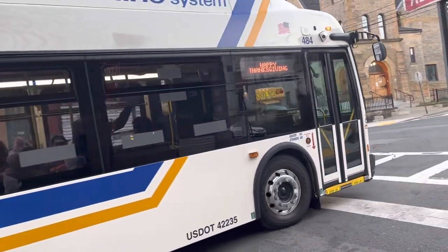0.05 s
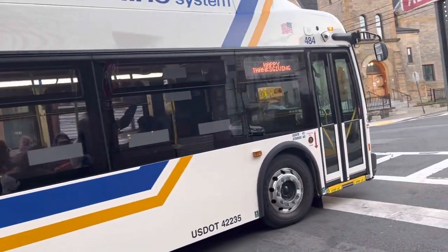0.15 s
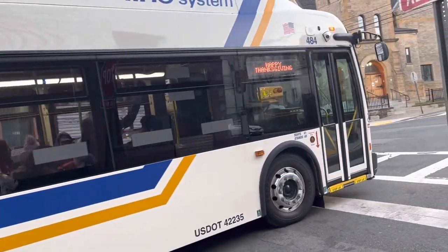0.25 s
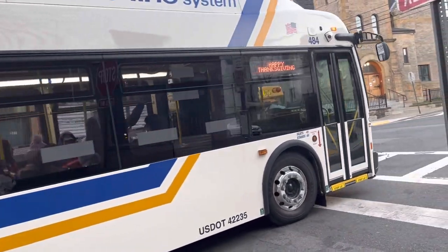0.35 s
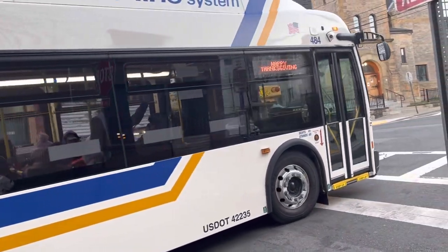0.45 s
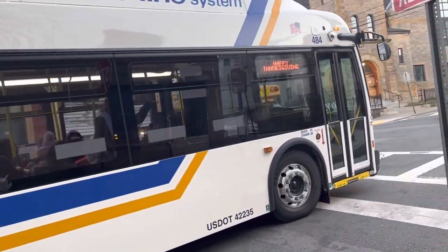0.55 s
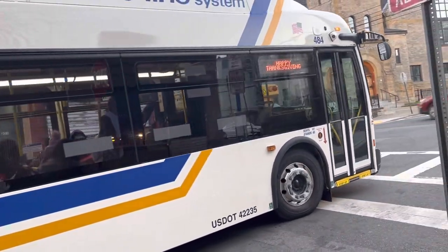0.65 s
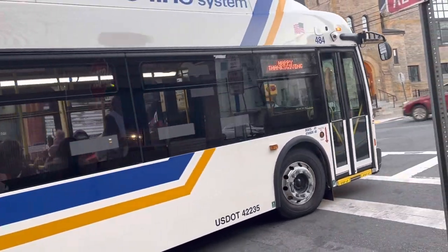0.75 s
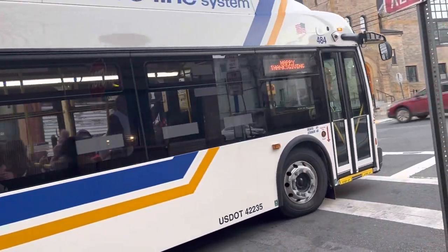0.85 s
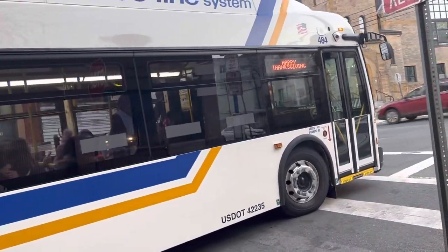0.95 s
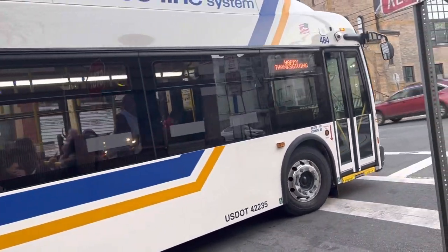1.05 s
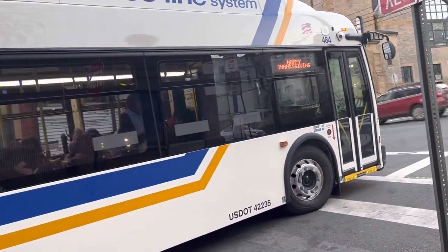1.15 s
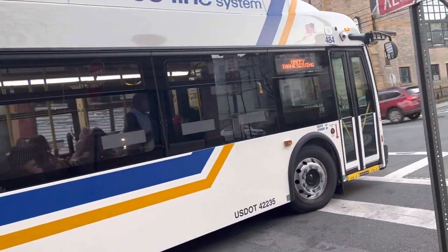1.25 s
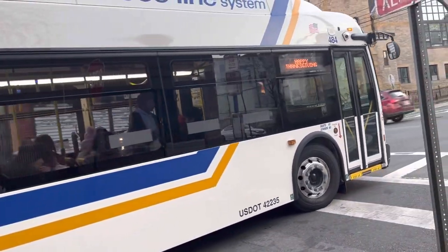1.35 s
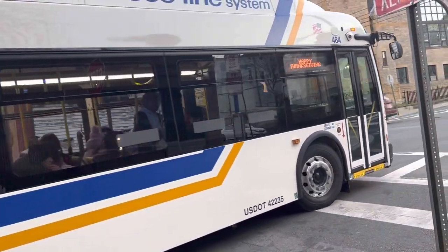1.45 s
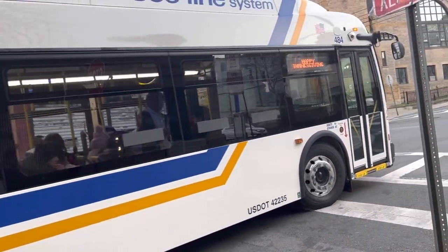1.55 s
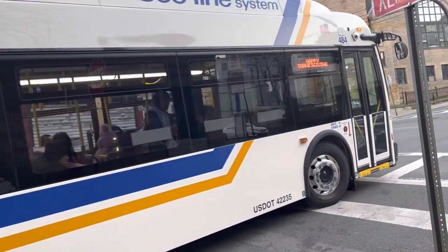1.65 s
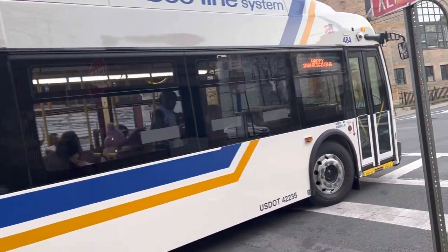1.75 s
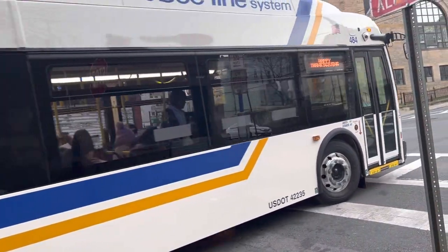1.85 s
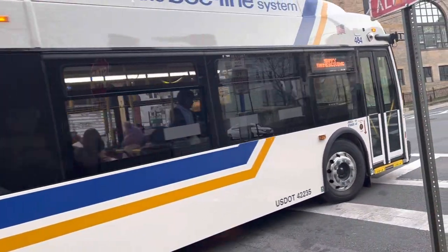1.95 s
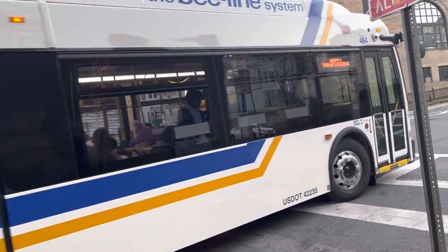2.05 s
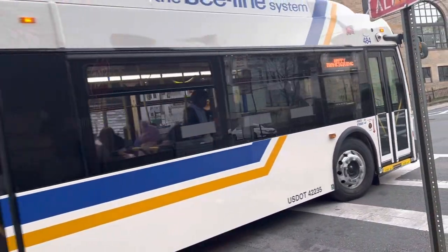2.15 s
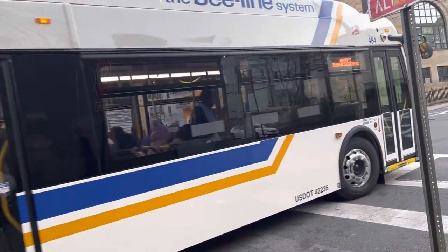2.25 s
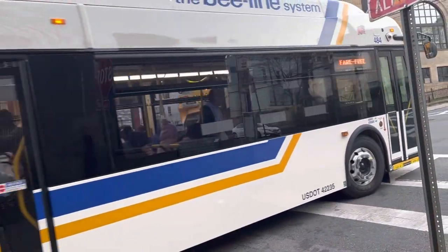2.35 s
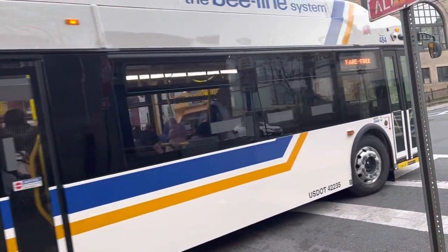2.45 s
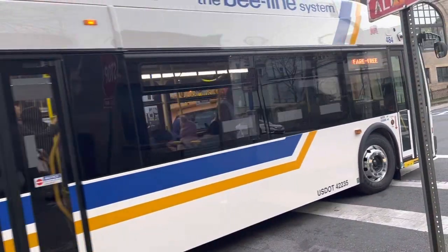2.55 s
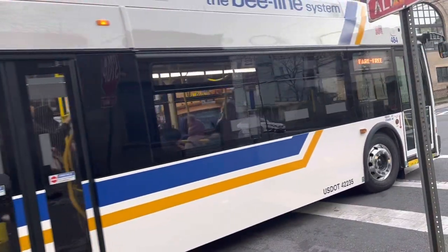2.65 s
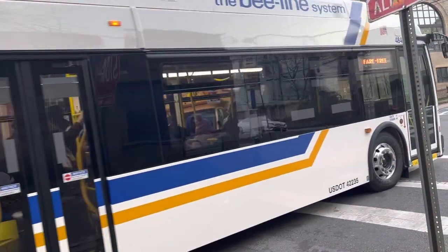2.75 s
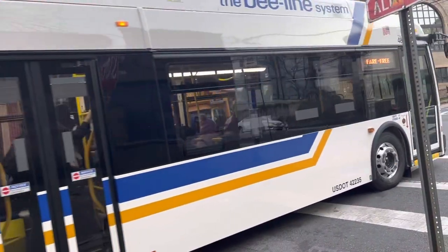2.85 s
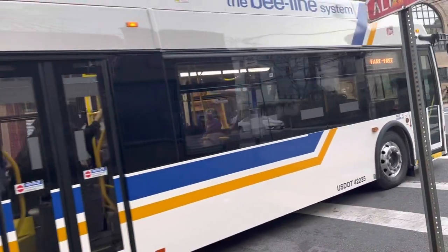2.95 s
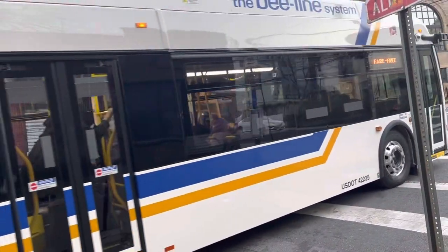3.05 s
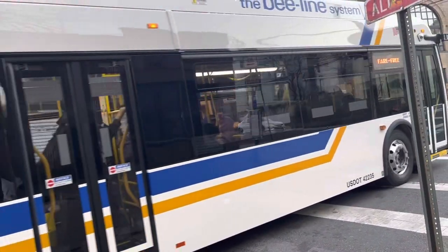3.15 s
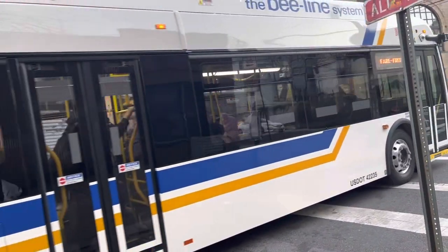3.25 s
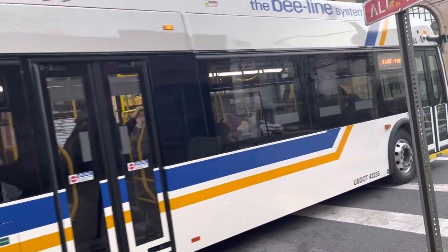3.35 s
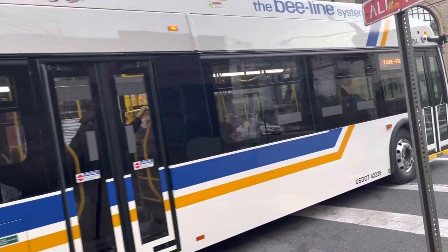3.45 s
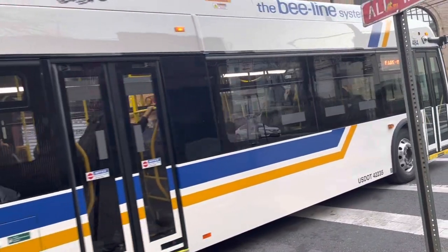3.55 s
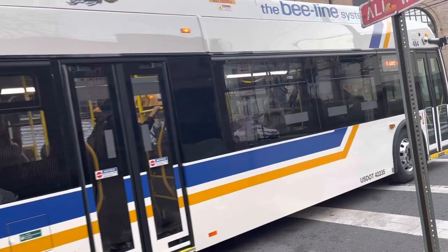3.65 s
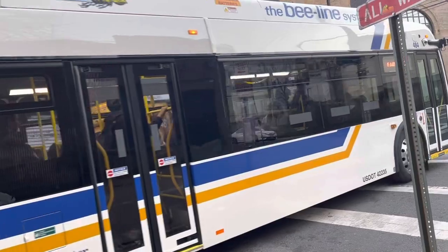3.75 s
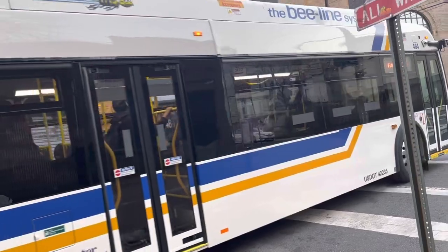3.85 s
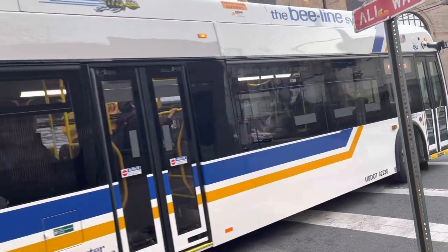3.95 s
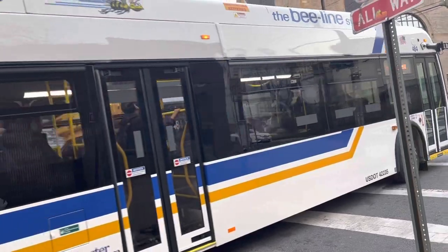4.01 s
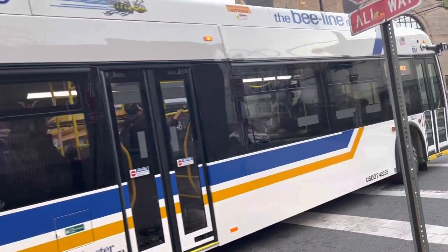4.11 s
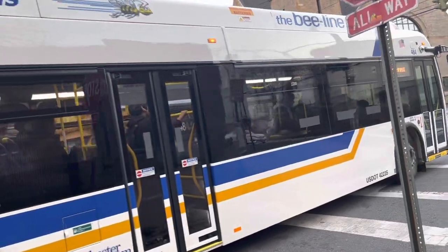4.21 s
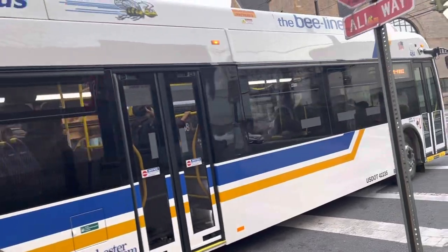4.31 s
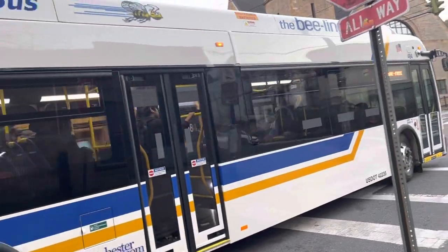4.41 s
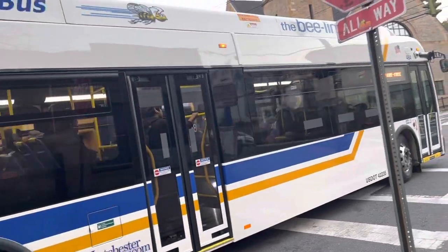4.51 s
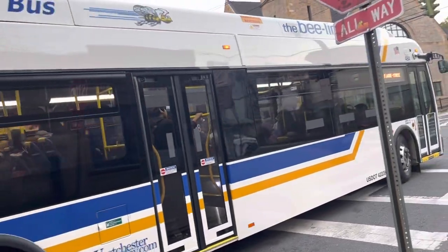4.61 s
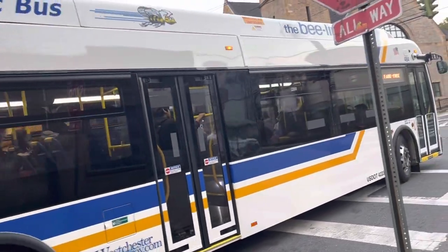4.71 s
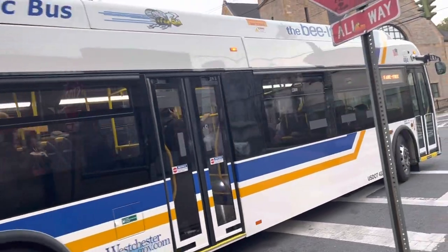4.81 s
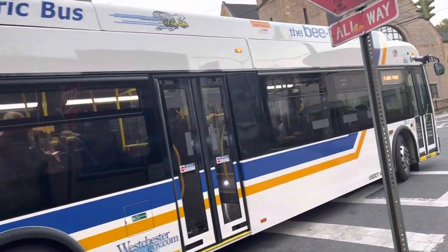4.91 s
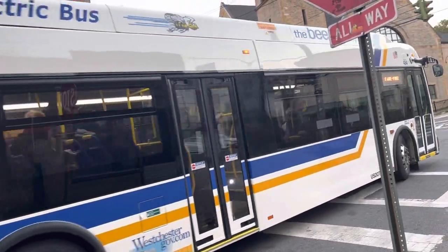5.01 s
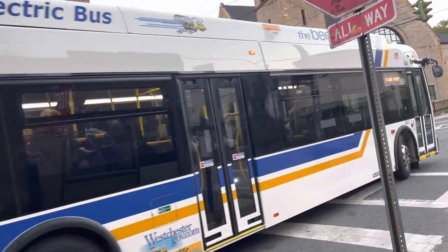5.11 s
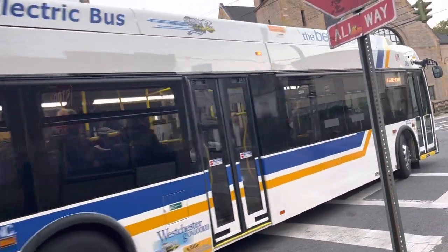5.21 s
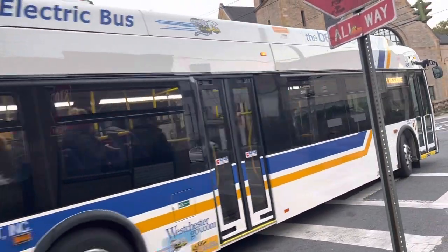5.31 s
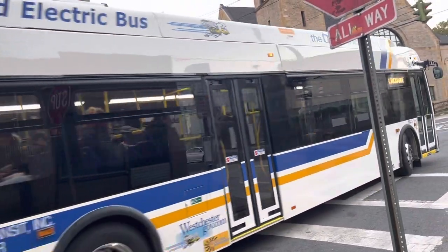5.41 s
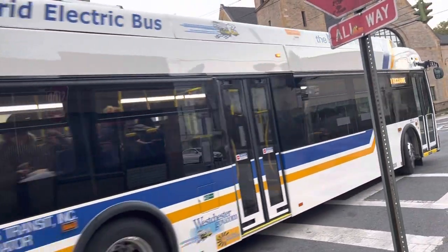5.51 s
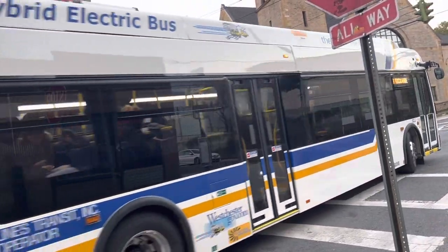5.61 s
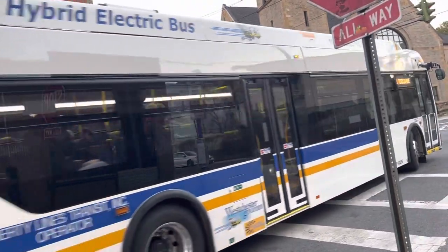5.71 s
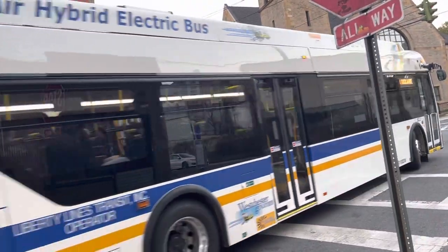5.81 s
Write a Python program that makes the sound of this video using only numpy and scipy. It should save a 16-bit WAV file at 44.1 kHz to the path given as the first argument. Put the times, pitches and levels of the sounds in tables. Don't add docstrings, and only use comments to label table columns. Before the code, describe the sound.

A hybrid bus idles about ten metres away on a street, low throbbing exhaust with faint clatter and a steady hum. The engine blips near two seconds and settles; a soft air hiss follows, then a faint and a sharper very high brake squeak. From about four and a half seconds the revs climb with electric whine and buzz as the bus nears, loudest at the end. Handheld phone in stereo on the pavement, short echoes from house fronts.

```python
import sys
import numpy as np
from scipy import signal
from scipy.fft import rfft, irfft, next_fast_len
from scipy.io import wavfile
from scipy.ndimage import uniform_filter1d

SR = 44100
rng = np.random.default_rng(int(sys.argv[2]) if len(sys.argv) > 2 else 0)


def transcribe(u):
    v = np.clip(np.atleast_2d(u).T, -1, 1)
    q = np.round(v * 32767).astype(np.int16)
    wavfile.write(sys.argv[1], SR, q)


def ratio(d):
    e = np.asarray(d, float) / 20
    return 10 ** e


N = 258867
T = np.arange(N) / SR

# (time [s], firing rate [Hz], firing tone level [dB], exhaust drone level [dB])
ENGINE = [(0, 42.6, -35, -30.5), (1.2, 42.6, -31, -32.5), (1.62, 42.9, -31, -32), (1.8, 44.65, -35, -26.5),
          (1.94, 48.8, -34, -24.5), (2.08, 52.5, -30, -24), (2.25, 52.8, -28.5, -23.5),
          (2.48, 48.23, -24, -26.5), (2.72, 43.8, -36, -25.5), (3.3, 42.62, -30.5, -25.5),
          (4.55, 42.59, -29, -23), (4.82, 46.13, -25.5, -23), (4.95, 49.66, -23, -20.5),
          (5.1, 55.59, -30, -19.5), (5.25, 60.52, -35, -18.5), (5.38, 63.9, -23, -18.5),
          (5.55, 66.24, -22.5, -17.5), (5.87, 66.9, -34, -16)]
CYLINDER_DB = [-0.31, -0.64, 0.72, -2.3, 0.23, -.8]
# (frequency [Hz], width [Hz], level [dB])
EXHAUST_MODES = [(85.6, 17, -7.5), (119.3, 20, -8), (168.1, 16, -5.5), (281, 21, -7.5), (349, 34.3, -5),
                 (401.2, 22.8, -9), (628, 140, -7.5)]
# (frequency [Hz], width [Hz])
TAILPIPE = (232.4, 38.7)
# (time [s], distance [m])
DISTANCE = [
    (0, 11.1),
    (1.9, 11),
    (4.5, 10.2),
    (5.0, 7.4),
    (5.4, 5.35),
    (5.87, 4.75),
]
IDLE_DRONE_DB, IDLE_LOAD, LOAD_PER_HZ = -31.5, 0.53, .03
BOOM_DB, BOOM_DB_PER_S, BOOM_TURNED_S, BOOM_REV_DB = -6, 5, 2.7, -0.08

# (level at 10 m [dB], share of distance gain [ratio], share of exhaust effort [ratio])
BAY = [
    (-35, 0.79, 0.12),
    (-42.5, 0.39, 0.049),
    (-47, 0.76, 0.43),
    (-65, 1.9, .05),
]
# (frequency [Hz], level [dB per Hz])
RUMBLE = [(35, -19), (60, -0.5), (100, -10.5), (140, -3.5), (190, -2), (250, 0), (330, -6.5), (420, -7.5),
          (520, -9), (640, -7.5), (760, -14.5), (900, -18.5)]
# (frequency [Hz], level [dB per Hz])
KNOCK = [(750, -26), (1000, -0.5), (1250, 2), (1550, 2.5), (1700, -11)]
# (frequency [Hz], level [dB per Hz])
CLATTER = [(1600, -1.5), (1900, -1.5), (2500, -0.5), (3100, -6), (4000, -5), (4600, -7), (5300, -5),
           (6300, -11), (7200, -8), (8100, -19), (9000, -9.5), (11000, -22.5), (14000, -20), (15600, -30)]
# (frequency [Hz], level [dB per Hz])
AIR = [(8800, -24), (9800, -3), (11000, 0), (13000, -1), (13900, -8), (14600, -22)]
# (frequency [Hz], width [Hz], level [dB])
PANELS = [(660, 60, -47), (1450, 110, -45), (5330, 420, -57), (8010, 220, -68)]

# (frequency [Hz], rms level [dB])
COMPRESSOR = [(78, -45), (116, -32), (233, -35), (312, -42.5)]
# (level at rest [dB], level gained under full torque [dB])
SIDEBANDS = [
    (-76, 12),
    (-76, 9),
]
# (start time [s], rise [s])
TORQUE_S = (4.55, .5)
# (start time [s], length [s], level [dB])
LOW_BURSTS = [
    (5.11, .1, -39),
    (5.2, .145, -34),
    (5.335, .2, -38),
]
# (start time [s], length [s])
LOW_RATE_S = (5.11, 0.46)
# (start time [s],
# length [s], frequency [Hz], level [dB])
RINGS = [(0.8, .75, 3600, -70), (5.31, .2, 4243, -41), (2.04, .14, 1490, -46), (3.2, .25, 1190, -48),
         (0.6, .25, 1190, -50), (2.6, .3, 4050, -62), (5.5, .35, 1590, -46), (3.35, 1.0, 661, -41),
         (5.17, .14, 2150, -49)]
# (start time [s], length [s], level [dB])
VENT = (2.77, .54, -57.5)
# (frequency [Hz], width [Hz], level [dB])
VALVE_MODES = [(9150, 600, 1), (10500, 2000, 2)]
# (start time [s], length [s], frequency [Hz], level [dB])
SQUEAKS = [
    (3.54, 0.33, 14330, -54),
    (4.347, 0.34, 14180, -39.5),
]
# (start time [s], length [s], level [dB]); pitch at the start and its climb
MOTOR_ON, MOTOR_HZ, MOTOR_HZ_PER_S = (4.5, .55, -47), 1510, 620
# (start time [s], length [s], level at 10 m [dB], share of distance gain [ratio])
GEAR_ON = (5.1, 1.2, -54, 2.0)
GEAR_TEETH = 28

# (frequency [Hz], lead of the left [rad])
PORT_PHASE = [(0, 0), (150, .4), (400, .9), (750, 1.5), (1200, 3.1), (1550, 4.2), (1810, 6.3), (3450, 8.2),
              (4310, 7.2), (5430, 11.0), (7410, 9.8), (9400, 9.2), (10900, 6.3), (13000, 6.3), (13900, 4.0),
              (14350, 4.55), (14750, 3.2)]
# (frequency [Hz], left minus right level [dB])
PORT_BALANCE = [(40, -0.5), (110, 0), (370, .5), (680, 0.5), (1250, -5.5), (2290, 5), (4210, 6.5),
                (7730, 3.5), (14200, -1)]
# (frequency [Hz], level over the direct sound [dB])
STREET = [(40, -24), (150, -12), (400, -6), (1000, -3.5), (2500, 0), (5000, 1), (7500, -11), (14000, -14)]
STREET_T60_S, FIRST_ECHO_S = .18, .012
STREET_DRIFT = 8
TONE_ECHO_DB, TONE_DB = -9, 3


def level(x, db):
    return x * ratio(db) / np.sqrt(np.mean(x ** 2))


def curves(table):
    times, *columns = np.transpose(table)
    return [np.interp(T, times, column) for column in columns]


def on_log_hz(table, hz):
    table_hz, values = np.transpose(table)
    return np.interp(np.log(hz + 1), np.log(table_hz + 1), values)


def resonate(x, hz, width):
    b, a = signal.iirpeak(hz, hz / width, SR)
    return signal.lfilter(b, a, signal.lfilter(b, a, x))


def walk(rate):
    hold = int(SR / rate)
    steps = np.repeat(rng.standard_normal(N // hold + 1), hold)
    return 1.4 * uniform_filter1d(uniform_filter1d(steps, hold), hold)[:N]


def burst_db(start, length, attack=.3, release=.3):
    u = (T - start) / length
    ramp = np.minimum(u / attack, (1 - u) / release)
    return 20 * np.log10(np.clip(ramp, 1e-4, 1) ** 2)


def tone(hz, db, wobble_db, rate=9):
    phase = 2 * np.pi * (np.cumsum(hz * np.ones(N)) / SR + rng.random())
    return np.sqrt(2) * ratio(db + wobble_db * walk(rate)) * np.sin(phase)


def patchy_noise(spectrum, swell_db, flicker_db):
    f = np.fft.rfftfreq(N, 1 / SR)
    swell = walk(3.92)
    shaped = rfft(rng.standard_normal(N)) * ratio(on_log_hz(spectrum, f))
    lowest_hz, highest_hz = spectrum[0][0], spectrum[-1][0]
    half_octaves = np.arange(2 * np.log2(highest_hz / lowest_hz) + 1)
    out = 0
    for hz in lowest_hz * np.sqrt(2) ** half_octaves:
        slot = np.clip(1 - 2 * np.abs(np.log2(f / hz + 1e-9)), 0, 1)
        out = out + ratio(swell_db * swell + flicker_db * walk(13)) * irfft(shaped * slot, N)
    return level(out, 0)


def rung(mode, flutter_db):
    hz, width, db = mode
    ringing = resonate(rng.standard_normal(N), hz, width)
    return ratio(flutter_db * walk(14)) * level(ringing, db)


def diesel(firings, load, tone_db, drone_db, boom_db):
    fired = np.flatnonzero(np.diff(np.floor(firings))) + 1
    k = np.arange(len(fired))
    scatter_db = .8 * rng.standard_normal(len(fired))
    strength = ratio(np.array(CYLINDER_DB)[k % 6] + scatter_db)
    pulses = np.zeros(N)
    pulses[fired] = strength * (1 + np.clip(load[fired], 0, 1) * (-1) ** k)

    drone = 0
    for j, (hz, width, db) in enumerate(EXHAUST_MODES):
        drone = drone + (-1) ** j * ratio(db) / width * resonate(pulses, hz, width)
    drone = drone - ratio(boom_db) / TAILPIPE[1] * resonate(pulses, *TAILPIPE)
    drone = drone / np.sqrt(uniform_filter1d(drone ** 2, SR // 2) + 1e-18)
    firing_tone = np.sqrt(2) * ratio(tone_db) * np.sin(2 * np.pi * firings)
    return firing_tone + ratio(drone_db) * drone


def engine_bay(firings, rumble_db, knock_db, clatter_db, air_db):
    stroke = 1 + 1.05 * np.exp(-(firings % 1) / 0.37)
    rumble = ratio(rumble_db + 8.0) * patchy_noise(RUMBLE, 0.85, 0.92)
    knock = ratio(knock_db + 5.5) * patchy_noise(KNOCK, 0.33, 0.92)
    clatter = ratio(clatter_db + 2.5) * patchy_noise(CLATTER, 0.53, 0.67)
    panels = ratio(.6 * (knock_db + 42)) * sum(rung(mode, 3.8) for mode in PANELS)
    air = ratio(air_db + 1.0) * patchy_noise(AIR, 0.55, 2.4)
    return rumble + level(stroke, 0) * (knock + clatter + panels) + air


def compressor(near_db):
    return sum(tone(hz + 0.58 * walk(2.99), db + 0.67 * near_db, 1.78, 5.08) for hz, db in COMPRESSOR)


def inverter(hz, effort_db):
    high_off_db = 20 * np.log10(1.001 - ratio(burst_db(*LOW_RATE_S, .06, .06)))
    torque = np.clip((T - TORQUE_S[0]) / TORQUE_S[1], 0, 1)
    upper_db, lower_db = (db + gain_db * torque + .4 * effort_db + high_off_db for db, gain_db in SIDEBANDS)
    high = tone(8005 + hz + 6 * walk(25), upper_db, 3, 14)
    high = high + tone(8012 - hz + 6 * walk(25), lower_db, 3, 14)

    bursts = [db + burst_db(start, length, 0.16, 0.24) for start, length, db in LOW_BURSTS]
    low_db = np.max(bursts, axis=0)
    low = tone(5002 + 7 * walk(30), low_db + 3, 1.5, 30) + tone(10002, low_db - 21, 2.5)
    for carrier_hz, db in ((5002, -8), (10002, -23)):
        for side in (-1, 1):
            low = low + tone(carrier_hz + side * hz, low_db + db, 3, 20)
    return high + low


def belt_rings():
    out = 0
    for start, length, hz, db in RINGS:
        swell = np.sin(np.pi * np.clip((T - start) / length, 0, 1))
        out = out + swell * tone(hz + 18 * walk(20), db, 2.5, 15)
    return out


def air_valve():
    start, length, db = VENT
    return ratio(db + burst_db(start, length, 0.099, 0.23)) * sum(rung(mode, 1.8) for mode in VALVE_MODES)


def brake():
    out = 0
    for start, length, hz, db in SQUEAKS:
        out = out + tone(hz + 90 * walk(150), db + burst_db(start, length, 0.41, .5), 4.7, 60)
    return out


def traction_motor():
    start, length, db = MOTOR_ON
    hz = MOTOR_HZ + MOTOR_HZ_PER_S * np.clip(T - start, 0, length)
    return tone(hz, db + burst_db(start, length, .15, .15), 2.89, 15)


def generator_gear(hz, near_db):
    start, length, db, share = GEAR_ON
    return tone(GEAR_TEETH * hz, db + share * near_db + burst_db(start, length, .1, .1), 1.2, 20)


def street(x, tones):
    size = next_fast_len(N + SR // 2)
    f = np.fft.rfftfreq(size, 1 / SR)
    port = ratio(on_log_hz(PORT_BALANCE, f) / 2) * np.exp(.5j * np.interp(f, *np.transpose(PORT_PHASE)))
    ports = np.array([port, 1 / port])
    wet = ratio(on_log_hz(STREET, f))
    heard = rfft(x + tones, size) * ports
    t = T[:SR // 3]
    decay = ratio(-60 * t / STREET_T60_S) * (t > FIRST_ECHO_S)
    for share in (np.sin(STREET_DRIFT * T), np.cos(STREET_DRIFT * T)):
        tail = rng.standard_normal((2, SR // 3)) * decay
        echo = rfft(tail / np.linalg.norm(tail, axis=1, keepdims=True), size)
        sent = rfft((x + ratio(TONE_ECHO_DB) * tones) * share, size)
        heard = heard + sent * wet * echo * np.abs(ports)
    return irfft(heard / np.sqrt(1 + wet ** 2), size)[:, :N]


def scene():
    hz, tone_db, drone_db = curves(ENGINE)
    firings = np.cumsum(hz) / SR
    revs_over_idle = hz - hz[0]
    load = IDLE_LOAD + LOAD_PER_HZ * revs_over_idle
    near_db = 20 * np.log10(10 / curves(DISTANCE)[0])
    effort_db = drone_db - IDLE_DRONE_DB
    boom_db = BOOM_DB + BOOM_DB_PER_S * np.minimum(T, BOOM_TURNED_S) + BOOM_REV_DB * revs_over_idle
    bay_db = [db + near * near_db + effort * effort_db for db, near, effort in BAY]

    bus = diesel(firings, load, tone_db, drone_db, boom_db) + engine_bay(firings, *bay_db)
    bus = bus + compressor(near_db) + air_valve()
    tones = inverter(hz, effort_db) + belt_rings() + brake()
    tones = tones + traction_motor() + generator_gear(hz, near_db)
    return street(bus, ratio(TONE_DB) * tones)


def low_pass(x):
    return signal.sosfilt(signal.butter(12, 15600, fs=SR, output="sos"), x)


def record(dry):
    bass_cut = signal.butter(4, 33, "highpass", fs=SR, output="sos")
    mix = signal.sosfilt(bass_cut, dry)
    return low_pass(mix)


dry = scene()
out = record(dry)
transcribe(out)
```